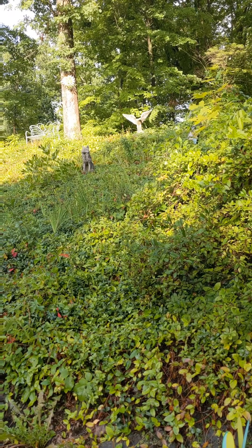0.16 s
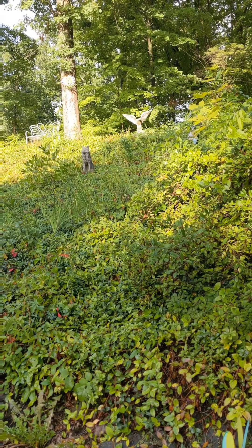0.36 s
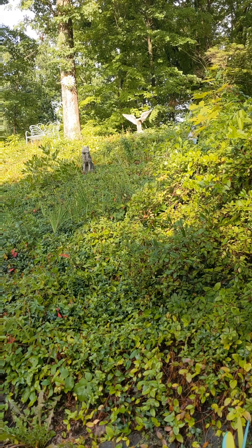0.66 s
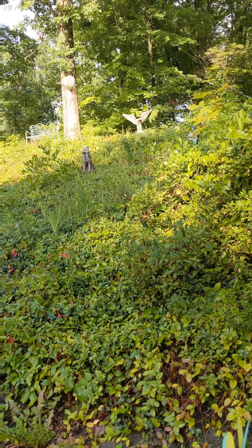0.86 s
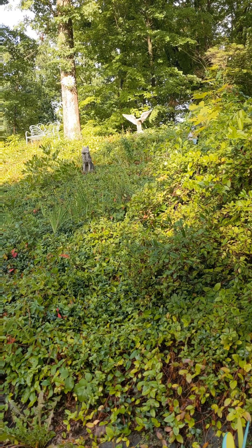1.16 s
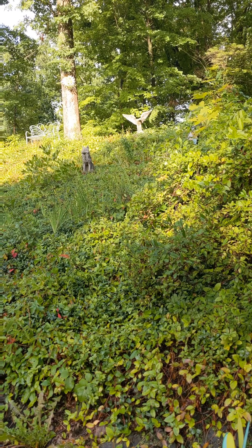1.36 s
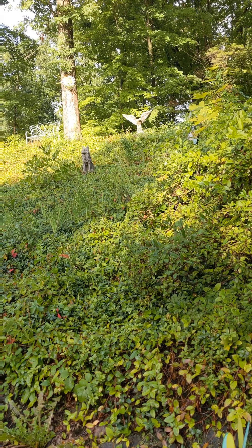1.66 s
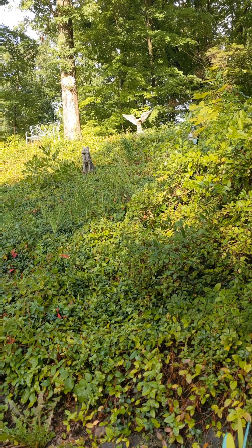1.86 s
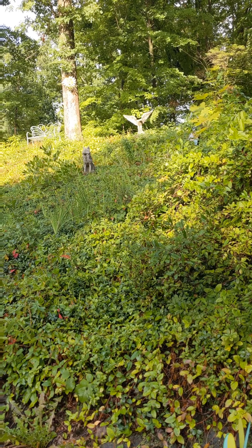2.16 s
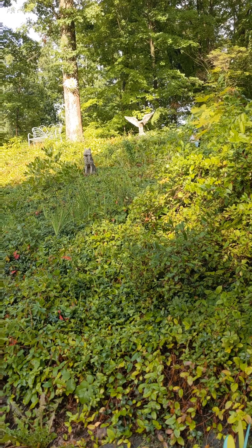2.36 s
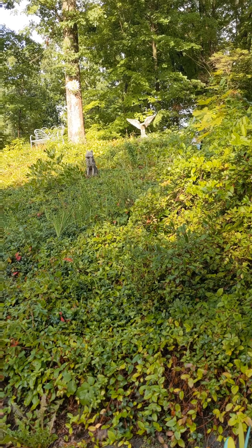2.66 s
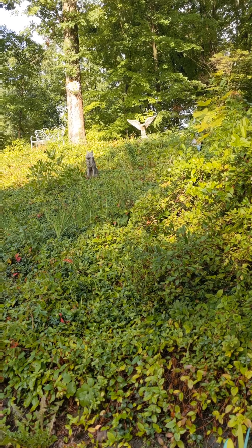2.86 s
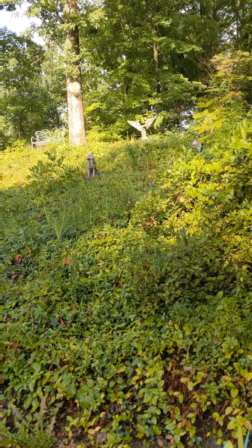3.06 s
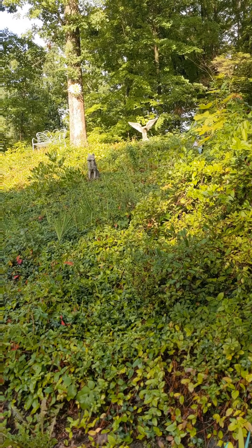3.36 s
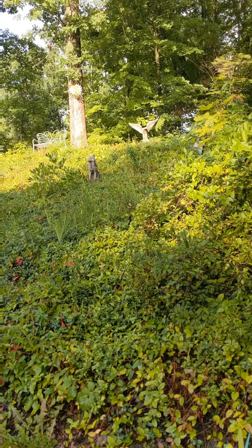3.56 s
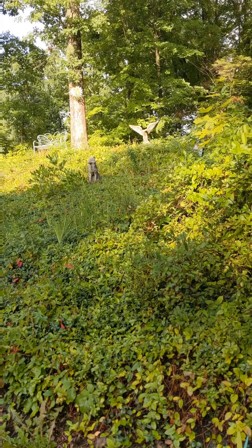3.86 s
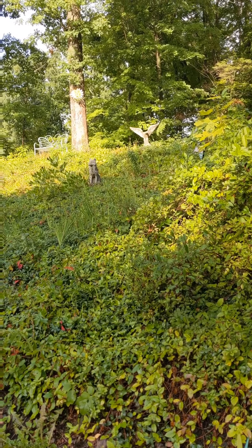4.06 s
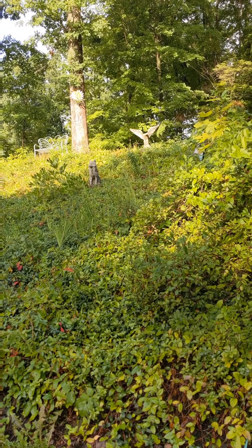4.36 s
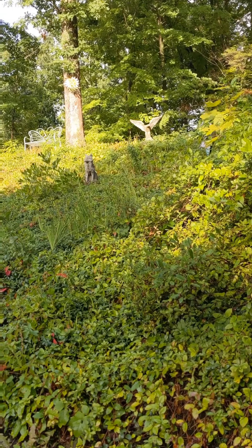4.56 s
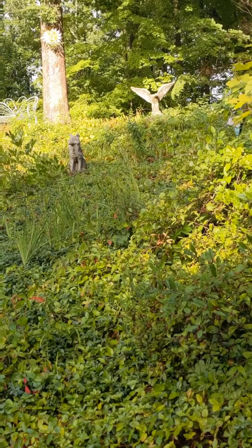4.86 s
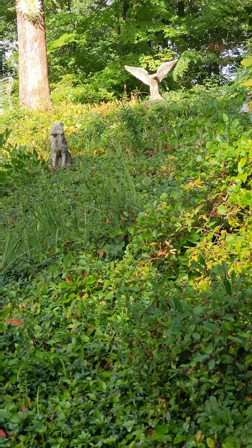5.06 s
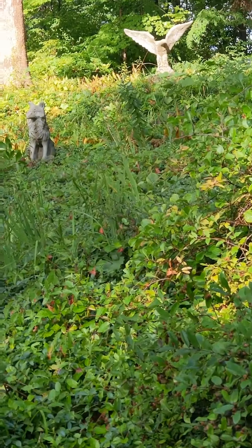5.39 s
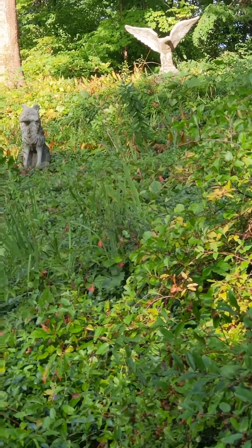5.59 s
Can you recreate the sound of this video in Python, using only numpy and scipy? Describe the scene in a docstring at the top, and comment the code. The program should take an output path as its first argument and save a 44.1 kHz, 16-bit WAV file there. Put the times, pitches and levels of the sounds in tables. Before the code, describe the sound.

Two close crickets chirp rapidly over trilling insects and a high buzz of distant cicadas that swells near the end, in a garden.

```python
"""Two close crickets chirp quickly over the high buzz of far cicadas, in a summer garden on a wooded slope.
More crickets chirp and trill in the ground cover, over a low distant rumble and an airy hiss.
Crickets scrape one wing over the other, and swaying leaves scatter their calls; cicadas click
ribbed plates called tymbals. Near the end the microphone zooms in on the trees and the chorus swells."""
import sys
import numpy as np
from scipy import signal
from scipy.fft import rfft, irfft
from scipy.io import wavfile

SR = 44100
rng = np.random.default_rng(int(sys.argv[2]) if len(sys.argv) > 2 else 0)


def to_wav(sig):
    """Store sig (one row per channel, or 1-D mono) as 16-bit WAV at the path in sys.argv[1].

    Samples outside -1..1 are clipped; the rate is SR.
    """
    pcm = np.clip(np.atleast_2d(sig), -1, 1) * 32767
    pcm = np.round(pcm).astype(np.int16)
    wavfile.write(sys.argv[1], SR, pcm.T)  # frames by channels


N = 252693
TIME = np.arange(N) / SR
FREQS_HZ = np.fft.rfftfreq(N, 1 / SR)


def from_db(db):
    """Turn decibels into a gain."""
    return 10 ** (np.asarray(db) / 20)


def rms_one(x):
    """Scale a sound to an average power of 1."""
    return x / np.sqrt(np.mean(x ** 2) + 1e-20)


def in_time(rows):
    """Join a table's points in time with straight lines: one curve for each value column."""
    seconds, *columns = np.transpose(rows)
    return [np.interp(TIME, seconds, column) for column in columns]


def in_frequency(rows):
    """Join a table's points along a logarithmic frequency axis."""
    hz, values = np.transpose(rows)
    return np.interp(np.log(FREQS_HZ + 1), np.log(hz), values)


def equalise(x, spectrum):
    """Turn each frequency up or down by the dB in a table."""
    return irfft(rfft(x) * from_db(in_frequency(spectrum)), N)


def pan(left_db):
    """Left and right gains, with the left louder by this many dB."""
    return from_db(np.array([[.5], [-.5]]) * left_db)


def ease(start_s, length_s):
    """A smooth step from 0 to 1."""
    return np.sin(np.pi / 2 * np.clip((TIME - start_s) / length_s, 0, 1)) ** 2


def drift(rate):
    """A smooth random wander, about 1 in size, with roughly this many turns a second."""
    pole = np.exp(-80 * np.pi * rate / SR)
    noise = rng.standard_normal(N // 40 + 2002)   # one value for every 40 samples
    slow = signal.lfilter([1], [1, -2 * pole, pole * pole], noise)[2000:]
    return np.interp(np.arange(N) / 40, np.arange(len(slow)), rms_one(slow))


# The rumble's tone. Each row: frequency in Hz, relative level in dB.
RUMBLE_SPECTRUM = [(22, -43), (32, -20), (46, -9.5), (57, -5), (70, 1), (100, -5.5), (128, -5.5),
                   (150, -3.5), (260, -11.5), (480, -18.5), (720, -16.5), (900, -24.5), (1400, -26.5),
                   (2500, -55)]
# How alike left and right are. Each row: frequency in Hz, likeness from 0 to 1.
RUMBLE_LIKENESS = [(60, 0.99), (125, 0.96), (250, 0.97), (500, 0.91), (800, 0.96), (1200, 0.033),
                   (3000, 0.046)]
# The rumble's loudness. Each row: time in seconds, relative level in dB.
RUMBLE_LEVEL = [(0.0, -53.5), (0.13, -56), (5.73, -57)]
# How full zoom changes the rumble's tone. Each row: frequency in Hz, boost or cut in dB.
ZOOM_COLOUR = [(40, 3), (80, -8.5), (160, 5.5), (400, 7), (900, 7), (2000, 2)]


def distant_rumble(zoom, gain_db=3.5):
    """Low noise, much the same on both sides; zooming thins the bass and lifts the middle range."""
    alike = np.clip(in_frequency(RUMBLE_LIKENESS), 0, 1)
    mid, side = rfft(rng.standard_normal((2, N)))
    noise = irfft(np.sqrt(1 + alike) * mid + np.sqrt(1 - alike) * side * [[1], [-1]], N)
    wide = rms_one(equalise(noise, RUMBLE_SPECTRUM))
    close = equalise(wide, ZOOM_COLOUR)
    return from_db(in_time(RUMBLE_LEVEL)[0] + gain_db) * ((1 - zoom) * wide + zoom * close)


# The tone of the hiss. Each row: frequency in Hz, relative level in dB.
HISS_SPECTRUM = [(300, -25), (700, -0.5), (1100, -1.5), (1800, 3.5), (3000, 3.5), (8500, -1.5), (10500, 1),
                 (13000, 0.5), (14700, -1), (15600, -6.5)]


def air_hiss():
    """The even hiss of the air."""
    return from_db(-55) * pan(-.9) * rms_one(equalise(rng.standard_normal((2, N)), HISS_SPECTRUM))


def foliage(x, scatter_db, decay_s, sway_per_s=1.5):
    """Mix a call with its fading echoes off swaying leaves, different on each side; power is kept."""
    age = np.arange(SR // 4) / SR
    echoes = rng.standard_normal((2, 2, len(age))) * from_db(-60 * age / decay_s)
    one_way, other_way = signal.fftconvolve(x[None, None], echoes, axes=2)[..., :N]
    sway = np.pi * sway_per_s * TIME + drift(sway_per_s)
    scattered = rms_one(np.cos(sway) * one_way + np.sin(sway) * other_way) * np.std(x)
    return (x + from_db(scatter_db) * scattered) / np.hypot(1, from_db(scatter_db))


def wing_song(strokes, top_hz, duty, arch_hz, fall_hz, rasp_hz, octave_db):
    """A wing scrapes over a row of teeth: pitch and loudness follow its speed, which peaks mid-stroke."""
    # strokes counts up by 1 per stroke; duty is the share of that time that sounds
    place = np.clip(((strokes + .5) % 1 - .5) * 2 / duty, -1, 1)   # -1 as a stroke starts, 1 as it ends
    hz = top_hz - arch_hz * place ** 2 - fall_hz * place + rasp_hz * drift(316)   # uneven teeth rasp
    phase = 2 * np.pi * np.cumsum(hz) / SR
    tone = np.sin(phase) + from_db(octave_db) * np.sin(2 * phase)
    pressure = from_db(.8 * drift(24))   # no two strokes are alike
    return np.sqrt(2) * pressure * np.cos(np.pi / 2 * place) ** 2 * tone


def tree_cricket():
    """A faint, lower-pitched trill wavers deep in the trees."""
    strokes = 50 * TIME + .3 * drift(1)
    top_hz = 3540 + 60 * drift(20)
    song = wing_song(strokes, top_hz, duty=.8, arch_hz=60, fall_hz=90, rasp_hz=70, octave_db=-40)
    return from_db(-66 + 1.5 * drift(4)) * pan(2) * foliage(rms_one(song), scatter_db=8, decay_s=.14)


def far_crickets(zoom, width, count=16):
    """A crowd blurred by distance, each with its own pace and pitch; zooming makes it louder."""
    crowd = 0
    for rank, (pace, start) in zip(np.linspace(0, 1, count), rng.random((count, 2))):
        strokes = (14 + 20 * pace) * TIME + start + .2 * drift(.95)
        top_hz = 6350 + 850 * rank + 90 * drift(10)
        song = wing_song(strokes, top_hz, duty=.55, arch_hz=552.6, fall_hz=258.6, rasp_hz=75.03,
                         octave_db=-46)
        crowd = crowd + from_db(3.4 * rank) * song   # the higher ones are louder
    blurred = rms_one(foliage(crowd, scatter_db=4, decay_s=.08))
    return from_db(-52 + 8.5 * zoom) * pan(10.8 * width) * blurred


def tymbal_buzz(spectrum, pulses_per_s, depth, count):
    """Cicadas buckle their tymbals in bursts of clicks, which the trees smear into pulsing noise."""
    buzz = 0
    for pace in rng.normal(1, .03, count):
        cycle = 2 * np.pi * (pulses_per_s * pace * TIME + .13 * drift(1.6))
        buzz = buzz + (1 + depth * np.cos(cycle)) * rng.standard_normal((2, N))
    return rms_one(equalise(buzz, spectrum))


# The tone of the cicadas all around, and of those ahead. Each row: frequency in Hz, relative level in dB.
AROUND_SPECTRUM = [(1500, -47), (2200, -19), (2900, -8.5), (3250, -11), (3550, -9.5), (3850, -9),
                   (4450, -7), (4900, -8), (5400, 0), (5900, -2), (6800, -1), (7300, -6), (7700, -3.5),
                   (8700, -24.5)]
AHEAD_SPECTRUM = [(2000, -26), (3500, -13.5), (5000, -9), (5750, -6), (6080, 3.5), (6300, -16), (6750, 5.5),
                  (7200, 3.5), (7450, -10), (7700, -20), (8100, -8), (8500, -65)]
# The loudness of the cicadas all around. Each row: time in seconds, relative level in dB.
AROUND_LEVEL = [(0.0, -58), (3.36, -54.5), (4.7, -56.5)]


def cicadas(zoom, width, around_gain_db=10):
    """Far cicadas merge into a high buzz; zooming favours the trees straight ahead."""
    around_db = in_time(AROUND_LEVEL)[0] + around_gain_db - 2 * zoom + .81 * drift(4.6)
    around = tymbal_buzz(AROUND_SPECTRUM, pulses_per_s=170, depth=.25, count=4)
    ahead = tymbal_buzz(AHEAD_SPECTRUM, pulses_per_s=66, depth=.22, count=1)
    return from_db(around_db) * pan(2.8 * width) * around + zoom * from_db(-39) * pan(.2) * ahead


def high_triller(zoom, width):
    """A cricket's rough, high trill with a thin octave above it; zooming turns away from it."""
    strokes = 43 * TIME + .21 * drift(.53)
    top_hz = 6860 + 35 * drift(20)
    song = wing_song(strokes, top_hz, duty=.85, arch_hz=90, fall_hz=60, rasp_hz=45, octave_db=-14.5)
    return from_db(-53.5 - 3 * zoom) * pan(width) * foliage(rms_one(song), scatter_db=2, decay_s=.08)


# The low trill's loudness. Each row: time in seconds, level in dB before its small swells.
LOW_TRILL_LEVEL = [(0, -53.5), (2.3, -54.5), (3.3, -58), (4.75, -58.5), (5.73, -53)]


def low_triller(width, fast_per_s=76.7, slow_per_s=62.2):
    """A cricket's fast trill of short, falling strokes that swell in small groups; it slows once."""
    slowed = ease(start_s=4.25, length_s=.42)
    strokes = np.cumsum((1 - slowed) * fast_per_s + slowed * slow_per_s) / SR
    top_hz = 5500 + 30 * drift(35)
    song = wing_song(strokes, top_hz, duty=.8, arch_hz=40, fall_hz=180, rasp_hz=25, octave_db=-40)
    swell_db = .7 + 1.5 * np.sin(2 * np.pi * (9 * TIME + .3 * drift(2)))
    gain = from_db(in_time(LOW_TRILL_LEVEL)[0] + swell_db)
    return gain * pan(4.5 * width) * foliage(rms_one(song), scatter_db=-7, decay_s=.05)


# The first close cricket's pace. Each row: time in seconds, chirps per second.
FIRST_PACE = [(0, 14.8), (1.6, 14.97), (2, 14.66), (4.3, 14.56), (4.75, 15.45), (5.73, 14.7)]
# How hard it sings. Each row: time in seconds, level at the top of a chirp in dB.
FIRST_EFFORT = [(0, -44.5), (2.2, -44.5), (2.7, -46), (3.3, -48.5), (3.75, -43), (4.7, -50.5),
                (5.05, -40.5), (5.73, -42.5)]
# Chirps that sound louder where the two close crickets coincide. Each row: time in seconds, extra dB.
LOUD_CHIRPS = [(1.37, 3), (1.435, 6), (1.635, 5), (2.925, 6), (2.99, 8), (5.69, 5)]


def first_chirper(opening_s):
    """A close cricket hurries and slackens; a few chirps stand out as it falls in step with the other."""
    extra_db = sum(db * np.exp(-((TIME - at_s) / .03) ** 2) for at_s, db in LOUD_CHIRPS)
    pace, = in_time(FIRST_PACE)
    strokes = np.cumsum(pace) / SR - pace[0] * opening_s
    top_hz = 7395 + 15 * drift(4)
    song = wing_song(strokes, top_hz, duty=.5, arch_hz=300, fall_hz=40, rasp_hz=32, octave_db=-42)
    return from_db(in_time(FIRST_EFFORT)[0] + extra_db) * song


# How hard the second close cricket sings.
# Each row: time in seconds, level at the top of a chirp in dB, level of its thin octave in dB.
SECOND_EFFORT = [(0, -48.5, -70), (.55, -49, -68), (.7, -55, -58.5), (1.5, -53, -61), (1.85, -46.5, -61.5),
                 (3.4, -46.5, -62.5), (4.5, -44, -65), (4.85, -54, -68), (5.73, -47, -68)]


def second_chirper(opening_s, chirps_per_s=15.48):
    """A close cricket that keeps strict time."""
    level_db, octave_db = in_time(SECOND_EFFORT)
    strokes = chirps_per_s * (TIME - opening_s)
    top_hz = 7440 + 20 * drift(4)
    return from_db(level_db) * wing_song(strokes, top_hz, duty=.5, arch_hz=420, fall_hz=40, rasp_hz=44,
                                         octave_db=octave_db - level_db)


def close_crickets(width, opening_s=.018):
    """The two start together, then slide in and out of step; weak echoes leave each chirp distinct."""
    songs = first_chirper(opening_s), second_chirper(opening_s)
    first, second = (foliage(song, scatter_db=-5, decay_s=.035) for song in songs)
    return pan(7 * width) * first + pan(3.5 * width) * second


def scene():
    """Insects over rumble and hiss; most sing to the left, and the zoom draws them to the centre."""
    zoom = .099 + .901 * ease(start_s=4.38, length_s=.97)   # 0 is wide, 1 is close
    width = 1 - .97 * zoom
    singers = close_crickets(width) + low_triller(width) + high_triller(zoom, width) + tree_cricket()
    chorus = cicadas(zoom, width) + far_crickets(zoom, width)
    return singers + chorus + distant_rumble(zoom) + air_hiss()


def record(dry, cutoff_hz=15600):
    """Cut the very highest treble steeply."""
    return signal.sosfilt(signal.ellip(12, .1, 80, cutoff_hz, fs=SR, output="sos"), dry)


dry = scene()
out = record(dry)
to_wav(out)
```